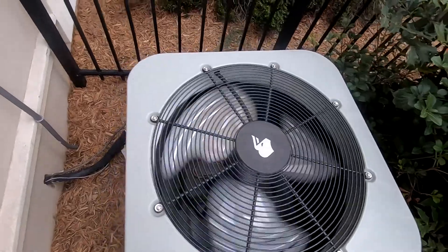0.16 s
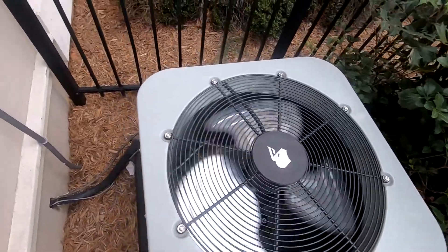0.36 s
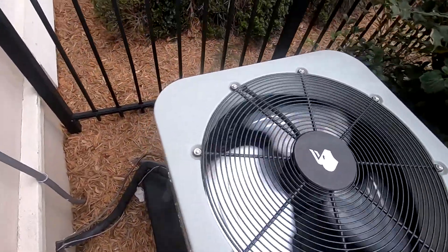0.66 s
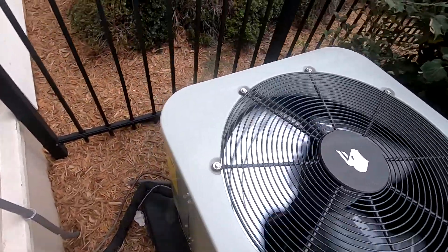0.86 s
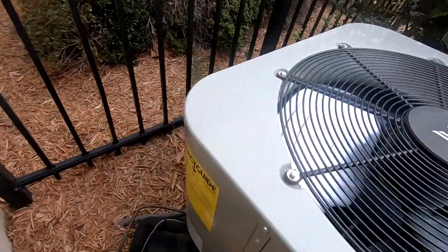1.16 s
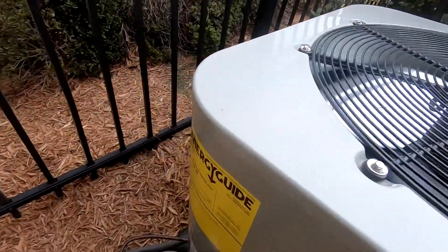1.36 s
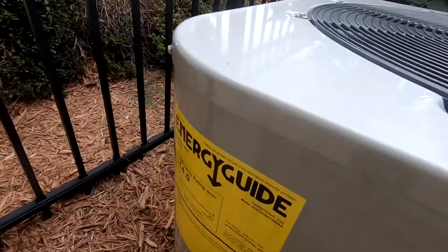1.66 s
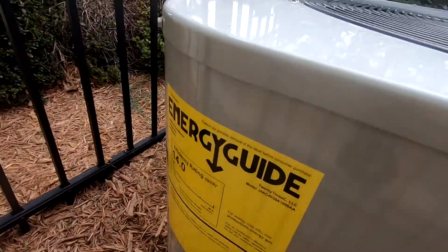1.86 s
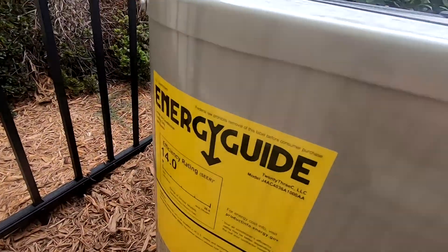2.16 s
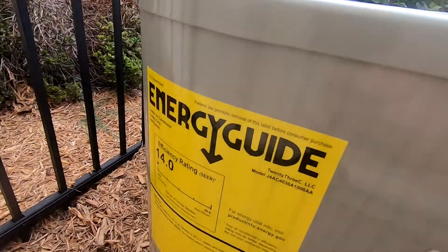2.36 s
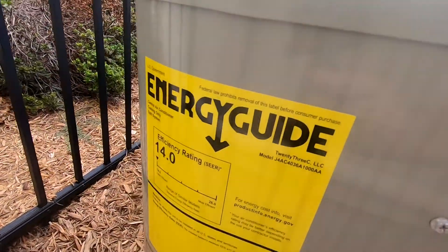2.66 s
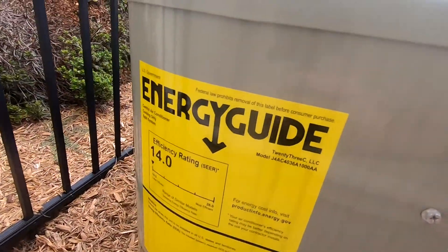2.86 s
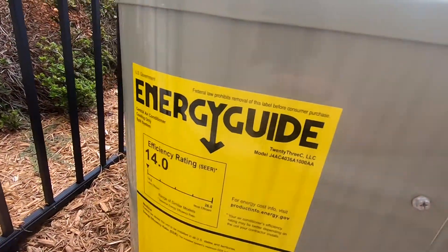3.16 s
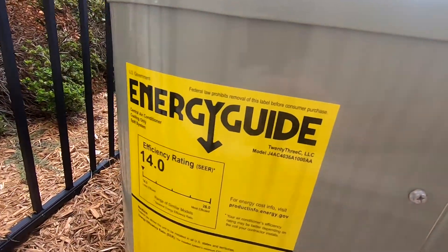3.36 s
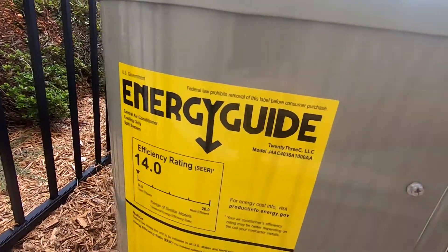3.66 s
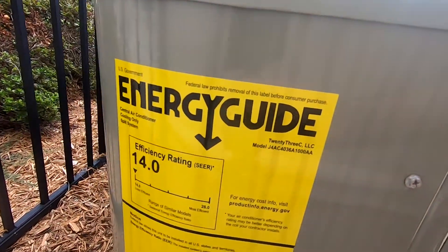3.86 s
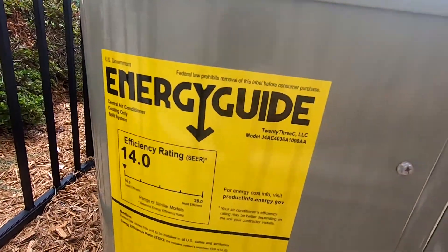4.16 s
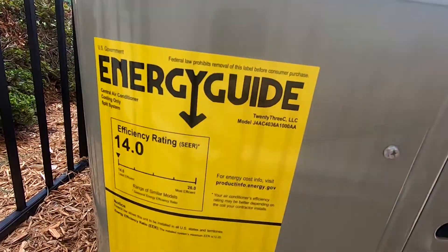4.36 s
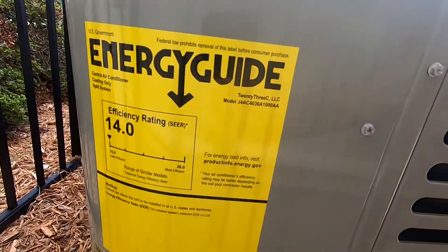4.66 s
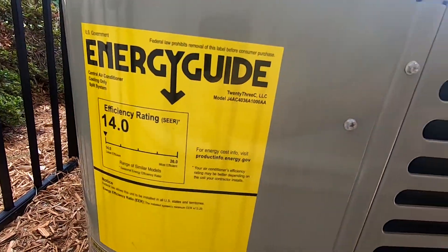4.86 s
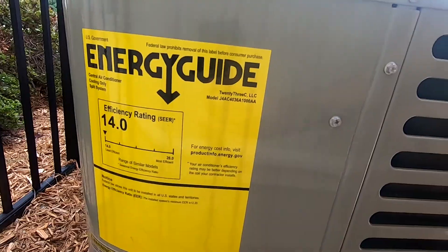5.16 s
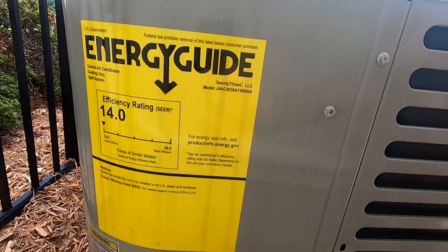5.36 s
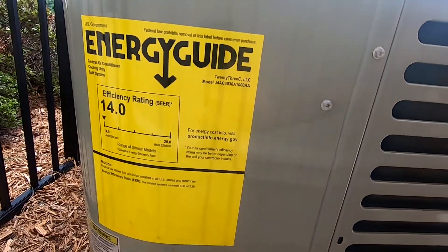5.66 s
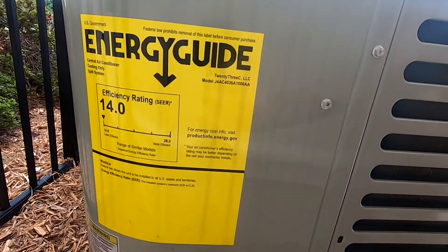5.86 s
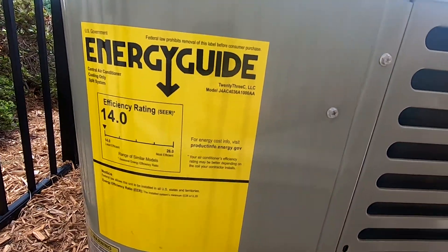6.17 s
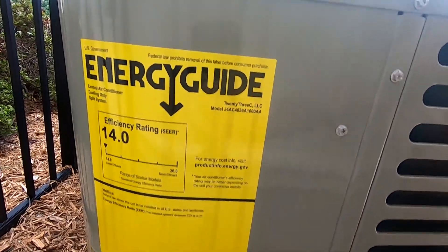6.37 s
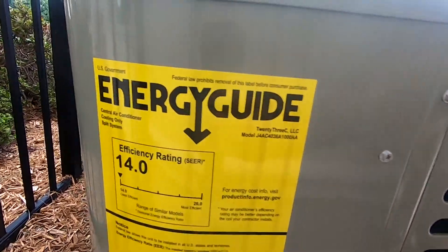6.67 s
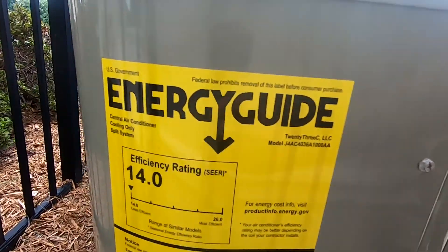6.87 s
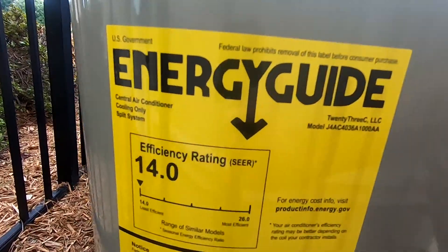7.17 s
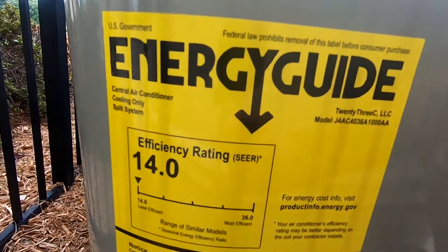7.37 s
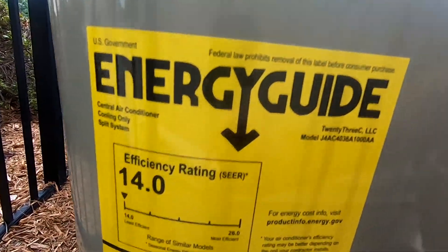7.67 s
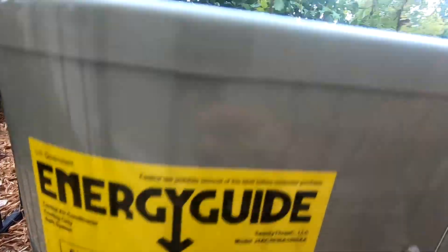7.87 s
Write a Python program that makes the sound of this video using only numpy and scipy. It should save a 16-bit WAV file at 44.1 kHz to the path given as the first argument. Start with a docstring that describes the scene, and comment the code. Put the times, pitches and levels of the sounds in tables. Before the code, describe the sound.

Rumbling gusts slap a close microphone held over the fan of an outdoor air conditioning unit. They quickly drop away, and after a short, hollow swish of air the machine's deep, pulsing drone swells and holds steady. The compressor hums and rings softly through the metal shell while air hisses through the coil. Narrow at first, the sound opens out into stereo in the second half.

```python
"""Gusts from a fan outlet buffet a hand-held microphone, then give way to the throb of a condenser unit
as the microphone sinks past the rim and settles beside the outdoor cabinet. Three fan blades pulse the
air, the compressor hums and rings through its shell, and air rushes in the coil. The sound starts
nearly mono on one sheltered microphone, then widens as it fades over to an open left and right pair."""
import sys
import numpy as np
from scipy import signal
from scipy.fft import rfft, irfft, next_fast_len
from scipy.io import wavfile
from scipy.ndimage import uniform_filter1d, minimum_filter1d, map_coordinates

SR = 44100
rng = np.random.default_rng(int(sys.argv[2]) if len(sys.argv) > 2 else 0)


def transcribe(u):
    """Save the signal u as a 16-bit wav file named by the first command-line argument.

    u: samples, shape (n,) or (channels, n), limited to [-1, 1]; the rate is SR.
    q: integer samples, one column per channel.
    """
    v = np.clip(np.atleast_2d(u).T, -1, 1)
    q = np.round(v * 32767).astype(np.int16)
    wavfile.write(sys.argv[1], SR, q)


N = 353682
BLADE_HZ, SHAFT_HZ, MAINS_HUM_HZ = 42.96, 59.142, 120.03


def amp(db):
    return 10 ** (np.asarray(db) / 20)


def unit_rms(x):
    return x / np.sqrt(np.mean(x ** 2) + 1e-20)


def along(points, hz):
    """Read (hz, value) points on a log frequency axis."""
    points_hz, values = np.transpose(points)
    return np.interp(np.log(hz + 1), np.log(points_hz + 1), values)


def curves(rows):
    """One automation curve for each column after the time."""
    time_s, *columns = np.transpose(rows)
    return [np.interp(np.arange(N) / SR, time_s, column) for column in columns]


def wobble(rate_hz):
    """A smooth random curve with rate_hz knots a second."""
    at = np.arange(0, N + 256, 256)
    knots = rng.standard_normal(int(N * rate_hz / SR) + 4)
    return np.interp(np.arange(N), at, map_coordinates(knots, [at * rate_hz / SR]))


def swell(centre_s, half_s):
    """A smooth rise and fall around one moment."""
    return np.exp(-((np.arange(N) / SR - centre_s) / half_s) ** 2)


def turn(hz):
    """Phase of a steady rotation."""
    return 2 * np.pi * hz * np.arange(N) / SR


def filtered(x, response):
    """Shape x with a complex frequency response."""
    size = next_fast_len(N + 8192, True)
    return irfft(rfft(x, size) * response(np.fft.rfftfreq(size, 1 / SR)), size)[..., :N]


def noise(spectrum, channels=1):
    """Coloured noise of rms 1."""
    return unit_rms(filtered(rng.standard_normal((channels, N)), lambda hz: amp(along(spectrum, hz))))


def patchy_noise(patch_db, band_db, channels):
    """White noise with short patches of random gain and narrow bands that drift slowly in and out."""
    spectra = signal.stft(rng.standard_normal((channels, N)), nperseg=512)[2]

    def field(bins, frames):
        across_bins = uniform_filter1d(rng.standard_normal(spectra.shape[1:]), bins, 0)
        return unit_rms(uniform_filter1d(across_bins, frames, 1))

    treble = np.linspace(0, 8, len(spectra[0])).clip(0, 1)[:, None]
    gain_db = patch_db * field(5, 12) + band_db * field(2, 150) * treble
    return signal.istft(spectra * amp(gain_db), nperseg=512)[1][:, :N]


# A small tick on the housing: start_s, level_db
HOUSING_TICKS = [(1.321, -39.5)]

def housing_ticks():
    """A very short, dry click in the treble."""
    out, t = np.zeros(N), np.arange(SR // 50) / SR
    for start_s, level_db in HOUSING_TICKS:
        out[round(start_s * SR):][:len(t)] += amp(level_db - 60 * t / .012) * rng.standard_normal(len(t))
    return filtered(out, lambda hz: 1 / (1 + (7500 / (hz + 1)) ** 6) / (1 + (hz / 12500) ** 8))


# Air heard while passing the rim: time_s, hollow_db, swish_db
RIM_LEVELS = [(0, -41, -40), (.5, -46, -40), (.9, -42, -42.5), (1.1, -28.5, -39), (1.45, -22.5, -38),
              (1.8, -40, -46), (2.3, -59, -56), (8.02, -70, -72)]

def rim_air():
    """Above the rim: a hollow band of noise and the swish of air through the grille."""
    def band(centre_hz, width_hz):
        ring = lambda hz: (1j * hz * width_hz / (centre_hz ** 2 - hz ** 2 + 1j * hz * width_hz)) ** 2
        return unit_rms(filtered(rng.standard_normal(N), ring))

    hollow_db, swish_db = curves(RIM_LEVELS)
    return amp(hollow_db) * band(648, 87) + amp(swish_db) * band(2420, 1100)


# Colour of the air on the sheltered microphone and on the open pair: freq_hz, gain_db
SHELTERED_EQ = [(200, -10), (300, -3), (450, -1.5), (800, -10), (1300, -16.5), (3700, -30.5), (4200, -30),
                (5700, -33.5), (6000, -40), (8000, -38), (9700, -52.5), (10800, -49), (11700, -59.5),
                (13200, -61.5), (15200, -73)]
OPEN_EQ = [(200, -12.5), (300, -3.5), (450, 0.5), (900, -8), (1300, -12), (3700, -26), (4200, -26.5),
           (6800, -24.5), (8100, -32), (8900, -31.5), (10500, -38.5), (11500, -48), (13800, -50.5),
           (15000, -62.5)]
# Narrow, rough bands in the hiss: centre_hz, half_width_hz, boost_db
HISS_PEAKS = [(4220, 80, 3.5), (6840, 120, 4)]
# Stereo width of the air: freq_hz, side_over_mid_db
AIR_WIDTH = [(200, -15), (400, -19.5), (560, -22), (900, 1), (1600, -5), (2900, -4.5), (5000, -2.5),
             (9000, -3), (11500, 0)]
# Balance of the pair: freq_hz, left_over_right_db
AIR_BALANCE = [(500, 1), (800, -3.5), (1200, -4.5), (3000, -4.5), (4500, -3), (6800, -5.5), (8000, -1.5),
               (15000, 0)]
# Phase between the pair: freq_hz, right_lead_rad
AIR_PHASE = [(4200, 0), (5500, 1.6), (7200, 2), (8400, 2.9), (15000, 3)]
LEFT_RIGHT = np.array([[1], [-1]])

def coil_air():
    """Air in the coil (sheltered, left, right); the pair shares the bass and differs in the treble."""
    def mid_side(hz):
        angle = np.arctan(amp(along(AIR_WIDTH, hz)))
        return np.array([np.cos(angle), np.sin(angle)])

    def peaks_db(hz, peaks):
        return sum(db / (1 + ((hz - centre) / half_width) ** 2) for centre, half_width, db in peaks)

    def pair_response(hz):
        gain_db = along(OPEN_EQ, hz) + peaks_db(hz, HISS_PEAKS) + LEFT_RIGHT * along(AIR_BALANCE, hz) / 2
        return amp(gain_db) * np.exp(-.5j * LEFT_RIGHT * along(AIR_PHASE, hz))

    mid, side = filtered(patchy_noise(patch_db=.7, band_db=1.62, channels=2), mid_side)
    sheltered = filtered(mid + side, lambda hz: amp(along(SHELTERED_EQ, hz) + peaks_db(hz, HISS_PEAKS[:1])))
    pair = filtered(mid + LEFT_RIGHT * side, pair_response)
    return np.vstack([unit_rms(sheltered), unit_rms(pair)])


# Fader rides along the microphone's path, before each layer's trim: time_s, throb_db, whoosh_db, air_db
PATH_LEVELS = [(0, -37, -31, -24.5), (.4, -31, -23.5, -28.5), (.64, -21, -29, -31.5),
               (.9, -38, -33.5, -31.5), (1.16, -29.5, -34, -29), (1.4, -19.5, -24, -24),
               (1.48, -17, -20.5, -25), (1.53, -10, -17, -25.5), (1.75, -9.5, -20, -25.5),
               (2.2, -10, -21, -29), (4, -10, -23.5, -29), (4.6, -11.5, -25, -31), (5.4, -12, -26, -30.5),
               (6.3, -12.5, -26, -29.5), (8.02, -13, -23.5, -28)]
# Crossfade from the sheltered microphone (0) to the open pair (1): time_s, open_share
OPEN_FADE = [(0, 0.08), (.3, 0.07), (.5, 0.02), (.9, 0), (3.97, 0), (4.5, 0.47), (5.3, 0.92), (6, 1)]
HISS_TRIM_DB, OPEN_HISS_DB, DRIFT_DB = 2.5, 3, 1

def air_round_cabinet(air):
    """Whoosh, rush and hiss take different paths round the cabinet, chopped by blades and compressor."""
    _, whoosh_db, air_db = curves(PATH_LEVELS)
    whoosh_db = whoosh_db + 2 + DRIFT_DB * wobble(2.95)
    rush_db = air_db + 6.5 + DRIFT_DB * wobble(3)
    hiss_db = air_db + HISS_TRIM_DB + OPEN_HISS_DB * curves(OPEN_FADE)[0] + DRIFT_DB / 2 * wobble(2.97)
    whoosh = filtered(air, lambda hz: 1 / (1 + (hz / 650) ** 4))
    hiss = filtered(air, lambda hz: 1 / (1 + (2800 / (hz + 1)) ** 4))
    rush = air - whoosh - hiss
    blade_beat = np.cos(turn(BLADE_HZ))
    stroke = np.cos(turn(SHAFT_HZ)) + .67 * np.cos(2 * turn(SHAFT_HZ))
    return (whoosh * amp(whoosh_db) * (1 + .099 * blade_beat)
            + rush * amp(rush_db) * (1 + .088 * blade_beat + .1 * stroke)
            + hiss * amp(hiss_db) * (1 + .1 * stroke))


# Shaft harmonics that ring in the shell: harmonic, sheltered_db, left_db, right_db
SHELL_TONES = [(15, -47, -46, -41), (16, -44, -51, -41), (17, -45, -48, -42), (18, -40, -46, -40),
               (19, -38, -40, -34), (20, -42, -44, -36), (21, -49, -59, -48), (25, -50, -53, -39),
               (27, -50, -51, -48), (32, -60, -61, -50), (33, -55, -63, -48), (34, -60, -58, -50),
               (36, -62, -57, -53), (37, -59, -55, -48), (39, -60, -59, -51), (43, -72, -60, -54),
               (44, -63, -54, -46), (45, -60, -66, -53), (47, -69, -62, -55), (48, -58, -59, -54),
               (49, -63, -56, -56), (51, -65, -57, -55), (54, -65, -62, -57), (56, -67, -64, -58),
               (59, -69, -63, -58), (60, -65, -67, -57), (63, -76, -70, -61), (68, -65, -66, -62),
               (70, -57, -61, -55), (80, -65, -69, -67), (93, -68, -67, -66), (95, -66, -70, -71),
               (96, -66, -70, -63), (97, -65, -74, -65)]
# Bed of faint harmonics between them: pitch_hz, level_db
FAINT_TONES = [(1300, -59.5), (2500, -68.5), (4000, -72.5), (5000, -73.5), (7000, -80)]
# Tones that swell or fade as the microphone moves: harmonic, centre_s, gain_db, half_length_s
TONE_SWELLS = [(16, 5, -11.5, 2.6), (16, 11, 9.5, .6), (18, 0.61, -16, .5), (18, 5.5, -6, 0.98),
               (19, 0.79, -15, 0.6), (20, 0.46, -10.5, .5), (20, 1.8, 9.5, 0.45), (20, 3.2, -7, 1.1),
               (20, 6.3, 3, 0.55), (20, 7.6, -20, 0.64), (25, 1.3, 12.5, 0.26), (27, 3.8, 6.5, 0.74),
               (27, 1.5, -6.5, 1), (27, 5.3, -9, .5), (44, 5.3, -11.5, .8), (44, 7.34, 5, .3),
               (70, 2.1, 7, .3), (70, 4.9, -8, .4), (70, 3.6, 2.5, .3), (70, 4.6, 4.5, .2), (70, 7, 5, .3),
               (19, 5.6, 2.5, 0.85), (15, 7.3, 4, .7), (15, .5, -6, .6), (17, 2.8, 3, 1), (17, 7.6, 4, .5),
               (21, 3.3, 4, .5), (25, 3.3, -4, 1.2)]

def compressor_shell():
    """Shaft harmonics ring through the shell, each band of them peaking at its own moment in the turn
    (sheltered, left, right)."""
    levels_db = {k: along(FAINT_TONES, k * SHAFT_HZ) + rng.normal(0, 3, 3) for k in range(22, 98)}
    levels_db.update({round(k): np.array(mic_db) for k, *mic_db in SHELL_TONES})
    out = np.zeros((3, N))
    for k, mic_db in levels_db.items():
        waver = .016 * k * wobble(7)
        smear = .08 * k ** 2 + .02 * k * rng.standard_normal()  # spreads the harmonics over the turn
        tone = np.cos(k * turn(SHAFT_HZ) + waver + smear)
        swells = [db * swell(s, half_s) for harmonic, s, db, half_s in TONE_SWELLS if round(harmonic) == k]
        drift_db = (1 if swells else 2.2) * wobble(1.5)
        flicker_db = .022 * k * wobble(11)
        out += amp(mic_db)[:, None] * (amp(sum(swells) + drift_db + flicker_db) * tone)
    return np.sqrt(2) * out


HUM_FLOOR_DB, HUM_UNDER_THROB_DB = -29, 9

def hum_level_db():
    """A steady floor, heard above the rim, plus a part that rises with the throb beside the cabinet."""
    throb_db = curves(PATH_LEVELS)[0]
    return 10 * np.log10(amp(2 * HUM_FLOOR_DB) + amp(2 * (throb_db - HUM_UNDER_THROB_DB)))


# Low shaft tones, relative to the hum level: harmonic, gain_db
LOW_SHAFT_TONES = [(1, -17.5), (2, -8.5), (3, -19), (8, -20.5)]

def motor_hum():
    """The motor's magnetic hum and the lowest shaft harmonics."""
    out = amp(-.5 + .36 * wobble(2.1)) * np.cos(turn(MAINS_HUM_HZ) - 2.7)
    for k, gain_db in LOW_SHAFT_TONES:
        out += amp(gain_db + wobble(4)) * np.cos(round(k) * turn(SHAFT_HZ))
    return np.sqrt(2) * amp(hum_level_db()) * out


# The fan's blast on the microphone: time_s, level_db
BLAST_LEVEL = [(0, -12.5), (.15, -9.5), (.3, -9), (.6, -12), (.68, -13), (.77, -11), (.8, -19.5),
               (.87, -22), (.92, -32), (1.0, -69)]
# Colour of the deep buffeting and of the flutter on top: freq_hz, gain_db
BUFFET_EQ = [(12, -29.5), (30, -3), (60, 3.5), (100, -1.5), (180, -3), (300, -12), (420, -37), (660, -120)]
FLUTTER_EQ = [(120, -44), (250, 3), (500, -10), (900, -17), (1500, -31), (3000, -84.5)]
# Bursts of flutter: centre_s, boost_db, half_length_s
FLUTTER_BURSTS = [(.07, 8, .04), (.3, 4, .04), (.47, 4, .04), (.748, 16.5, .035), (.83, 17, .03)]
# Single slaps of air: start_s, level_db, pitch_hz
AIR_SLAPS = [(.152, -2.5, 110), (.198, 4, 150), (.401, 4, 190), (.445, -1, 110), (0.485, -6.5, 130),
             (0.496, -0.5, 120), (.588, -3, 90), (.667, -9.5, 110), (0.697, -2, 130), (0.799, -8, 35),
             (0.813, -13, 230)]
FLUTTER_DB = -16

def fan_blast():
    """Eddies from the fan outlet buffet the microphone in lumps; left and right feel different eddies."""
    flutter_db = FLUTTER_DB + sum(db * swell(s, half_s) for s, db, half_s in FLUTTER_BURSTS)
    lumps = unit_rms(amp(3 * np.array([wobble(28), wobble(28)])))
    mid, side = lumps * (noise(BUFFET_EQ, channels=2) + amp(flutter_db) * noise(FLUTTER_EQ, channels=2))
    width = 2.05 * curves(OPEN_FADE)[0]
    out = amp(curves(BLAST_LEVEL)[0]) * (mid + width * side * LEFT_RIGHT)
    t, puff_noise = np.arange(SR // 20) / SR, noise(FLUTTER_EQ)[0]
    for start_s, level_db, hz in AIR_SLAPS:
        start = round(start_s * SR)
        push = -np.sin(2 * np.pi * hz * t) * np.sin(np.pi * np.minimum(hz * t / 1.4, 1))  # suck, then shove
        puff = .45 * puff_noise[start:][:len(t)] * amp(-60 * t / .034) * (1 - np.exp(-t / .00068))
        out[:, start:][:, :len(t)] += amp(level_db) * (push + puff)
    return out


# Blade overtones: harmonic, gain_db, fader (0 throb, 1 fourth harmonic, 2 hum)
BLADE_TONES = [(2, -11, 0), (3, -2.5, 2), (4, 1, 1), (5, -8.5, 2), (6, -15.5, 2)]
# Fader ride of the fourth harmonic: time_s, level_db
FOURTH_LEVEL = [(0, -24), (.5, -30), (1.16, -25.5), (1.56, -15), (1.75, -17.5), (4, -21), (4.4, -23),
                (8.02, -24)]
# Colour of the rumble under the throb: freq_hz, gain_db
RUMBLE_EQ = [(15, -33), (30, -12.5), (60, -3.5), (110, -1.5), (200, 0.5), (280, -13.5), (400, -40),
             (600, -90)]

def fan_blades():
    """Each passing blade is one pressure dip; turbulence shakes the upper harmonics most."""
    throb_db, hum_db = curves(PATH_LEVELS)[0], hum_level_db()
    faders_db = [throb_db, curves(FOURTH_LEVEL)[0], hum_db]
    phase = turn(BLADE_HZ) + 2.4
    throb = amp(throb_db + .32 * wobble(10)) * np.cos(phase)
    for k, gain_db, fader in BLADE_TONES:
        level_db = faders_db[round(fader)] + gain_db + .25 * k * wobble(5)
        shaken_phase = phase - 1.6 + .079 * wobble(6)
        throb -= amp(level_db) * np.cos(round(k) * shaken_phase + 1.4)  # the offsets shape the dip
    rumble = amp(hum_db - 2) * noise(RUMBLE_EQ)[0]
    return np.sqrt(2) * throb + rumble


# Air and shell tones duck under the hardest slap: time_s, gain_db
SLAP_DUCK = [(.37, -1), (.405, -3), (.45, -5), (.5, -3.5), (.6, -1)]

def scene():
    """Fade air and shell from the sheltered microphone to the pair; add the bass, blast and tick."""
    open_share = np.clip(curves(OPEN_FADE)[0], 0, 1)
    mics = air_round_cabinet(coil_air()) + compressor_shell()
    bass = fan_blades() + motor_hum()
    bass_side = filtered(bass, lambda hz: (.05j - .02) / (1 + (hz / 90) ** 2))  # heard a hair apart
    stereo_bass = bass + open_share * bass_side * LEFT_RIGHT
    air_and_shell = (1 - open_share) * mics[0] + open_share * mics[1:] + rim_air()
    return air_and_shell * amp(curves(SLAP_DUCK)[0]) + stereo_bass + fan_blast() + housing_ticks()


CEILING, TOP_HZ = .97, 15300

def record(dry):
    """A peak limiter, then a brick-wall high cut."""
    needed_gain = np.minimum(1, CEILING / (np.abs(dry).max(0) + 1e-9))
    gain = uniform_filter1d(minimum_filter1d(needed_gain, size=1201), size=601)
    return filtered(dry * gain, lambda hz: hz < TOP_HZ)


dry = scene()
out = record(dry)
transcribe(out)
```